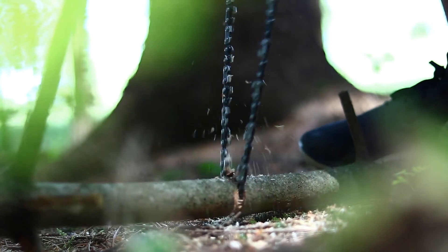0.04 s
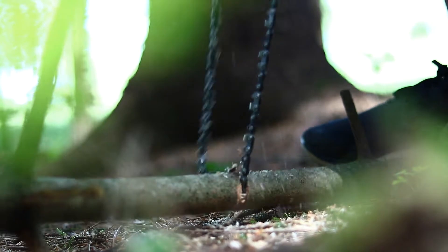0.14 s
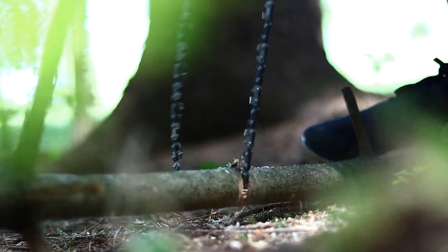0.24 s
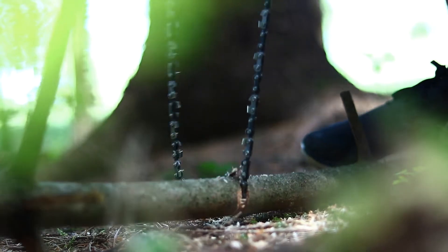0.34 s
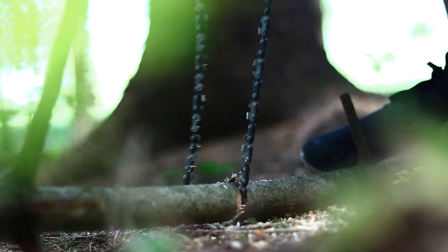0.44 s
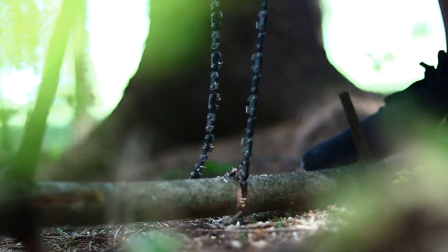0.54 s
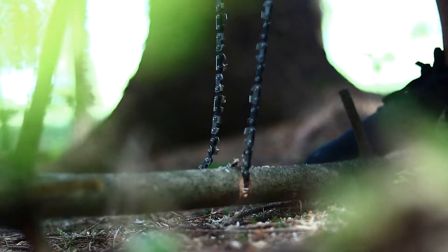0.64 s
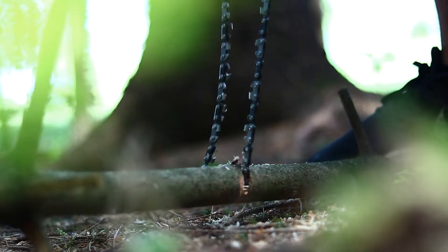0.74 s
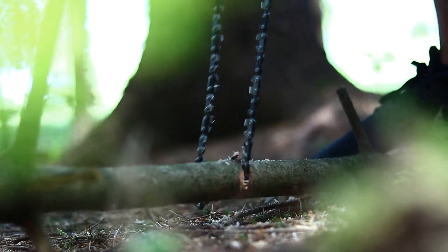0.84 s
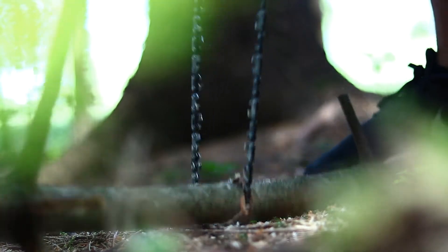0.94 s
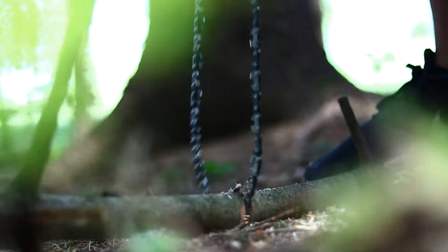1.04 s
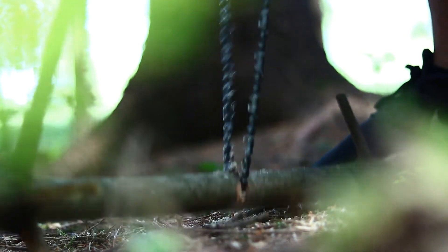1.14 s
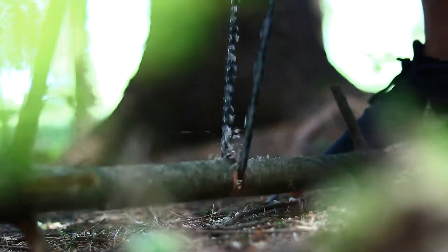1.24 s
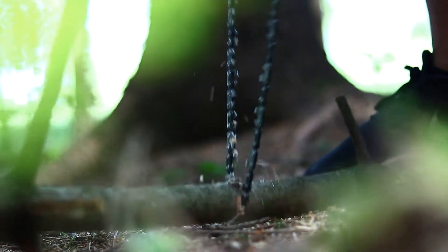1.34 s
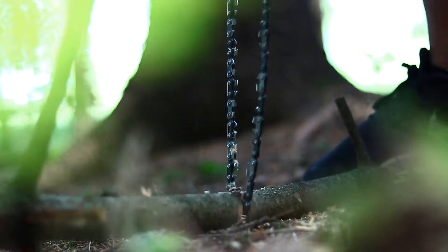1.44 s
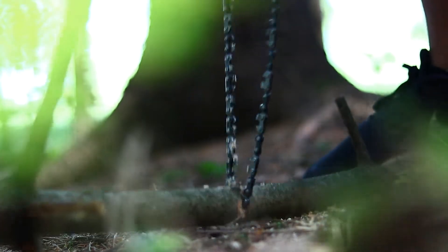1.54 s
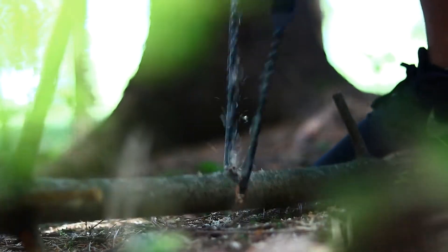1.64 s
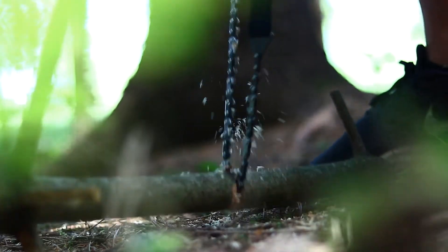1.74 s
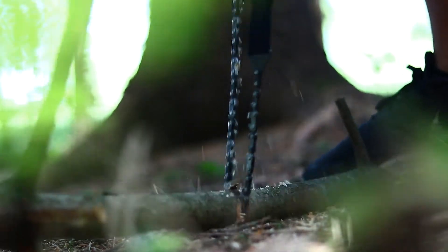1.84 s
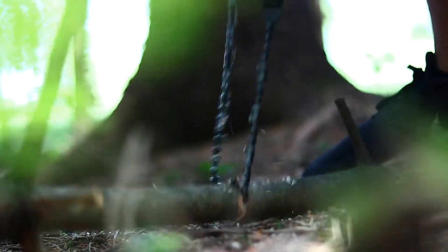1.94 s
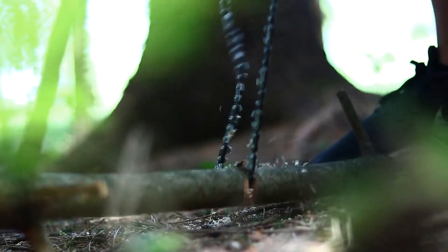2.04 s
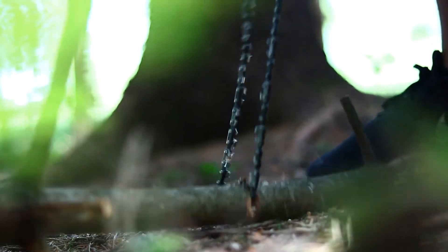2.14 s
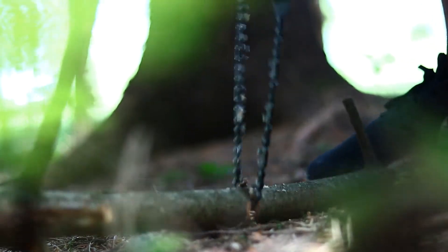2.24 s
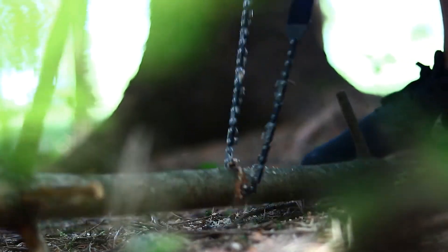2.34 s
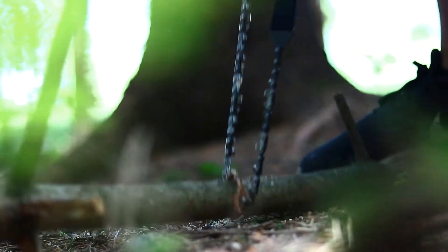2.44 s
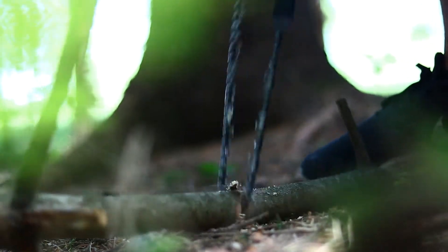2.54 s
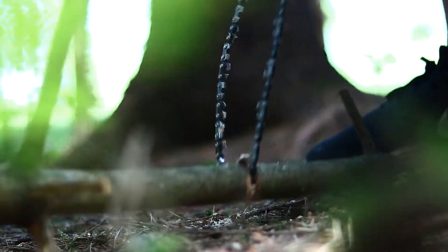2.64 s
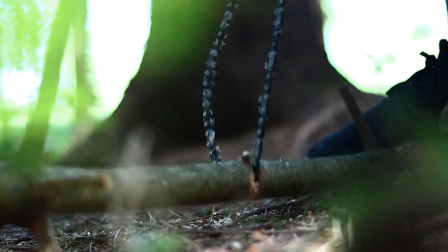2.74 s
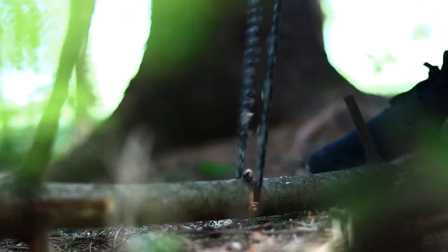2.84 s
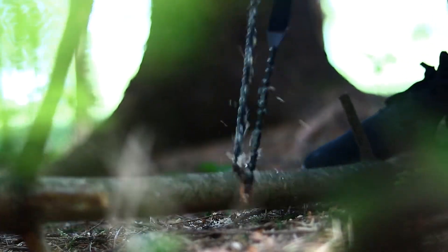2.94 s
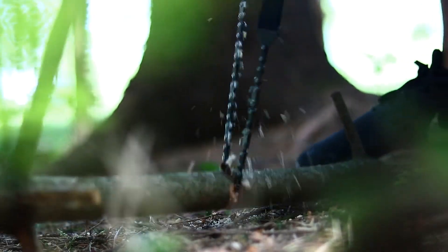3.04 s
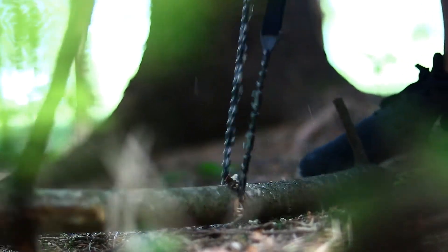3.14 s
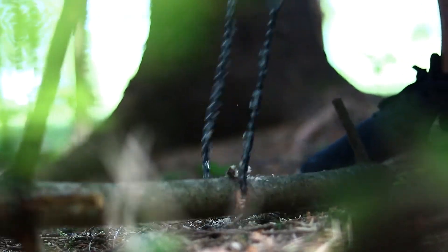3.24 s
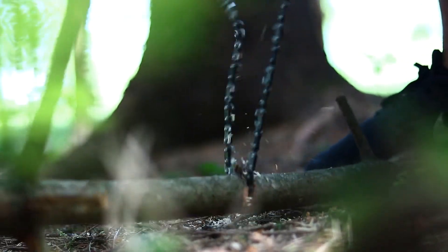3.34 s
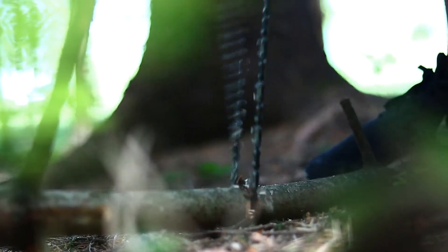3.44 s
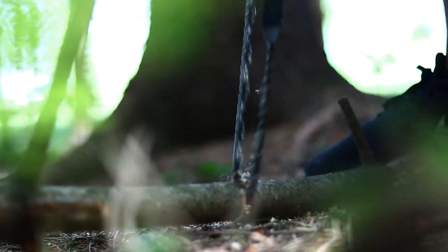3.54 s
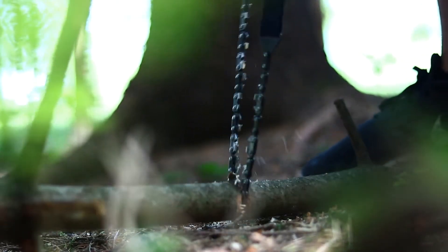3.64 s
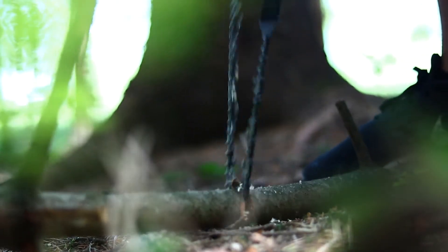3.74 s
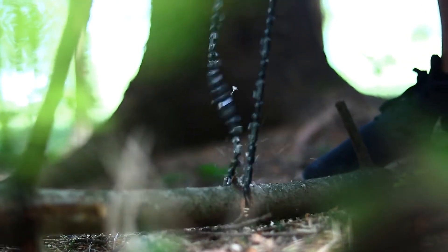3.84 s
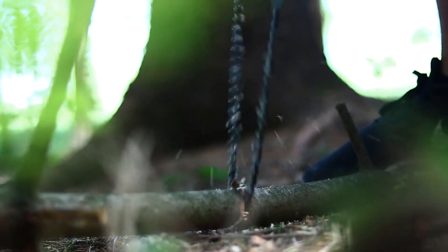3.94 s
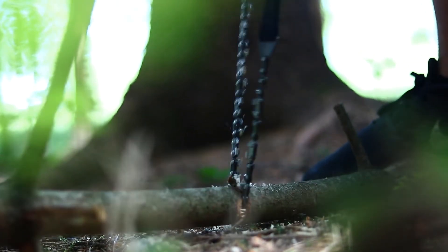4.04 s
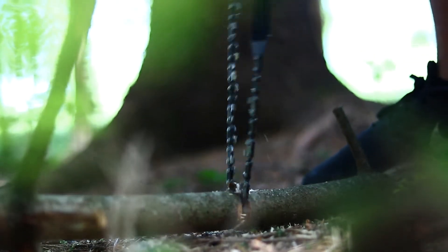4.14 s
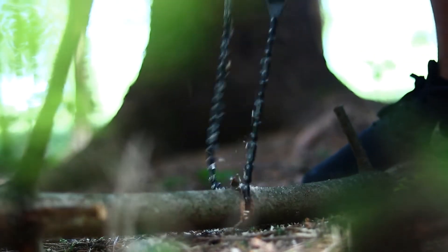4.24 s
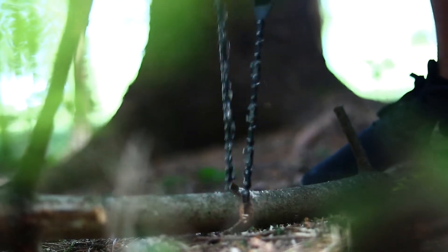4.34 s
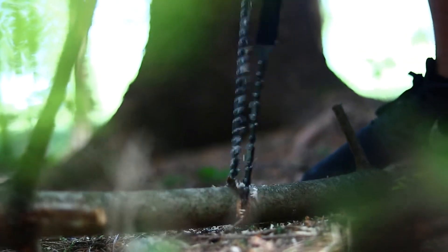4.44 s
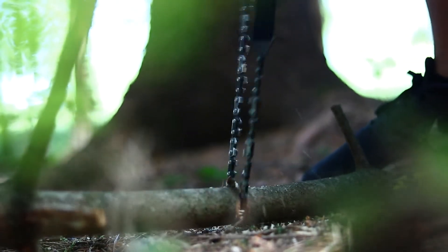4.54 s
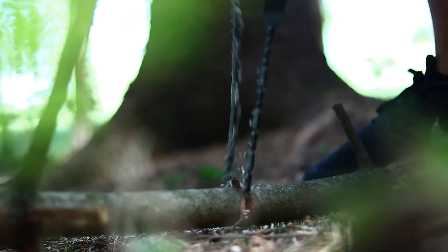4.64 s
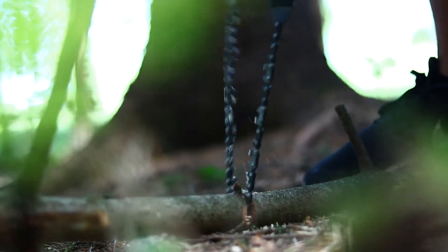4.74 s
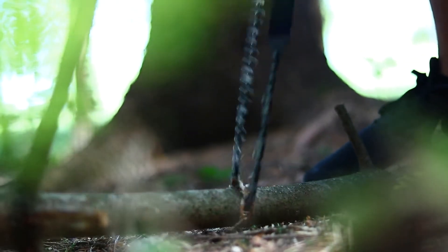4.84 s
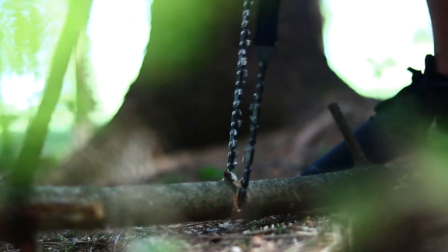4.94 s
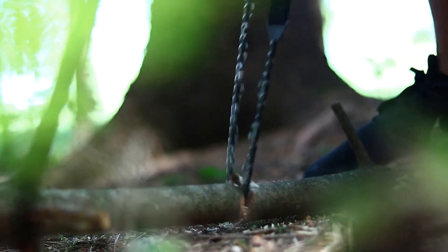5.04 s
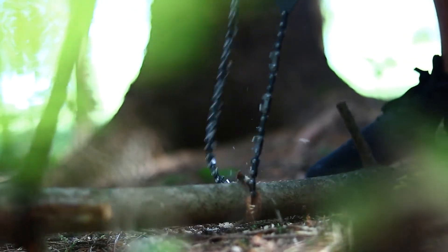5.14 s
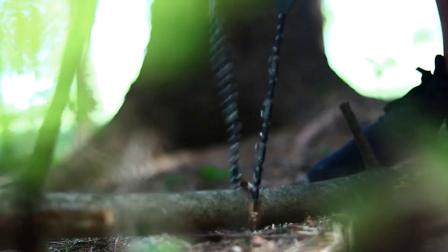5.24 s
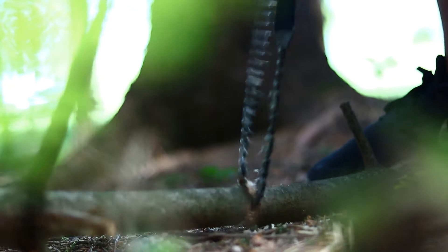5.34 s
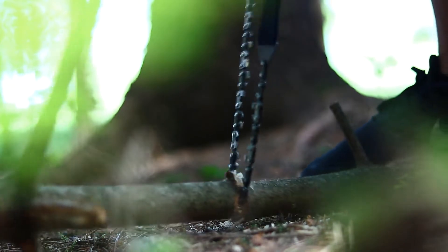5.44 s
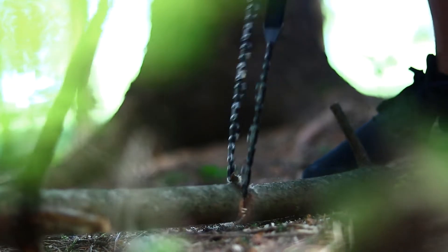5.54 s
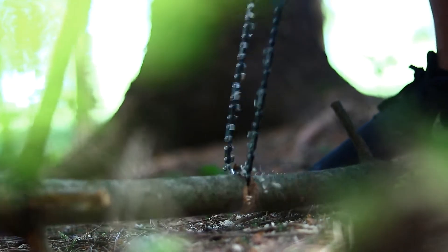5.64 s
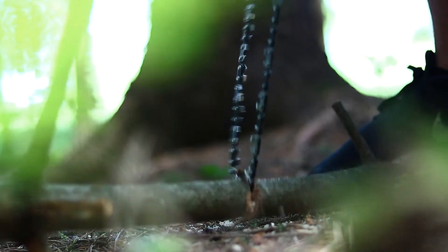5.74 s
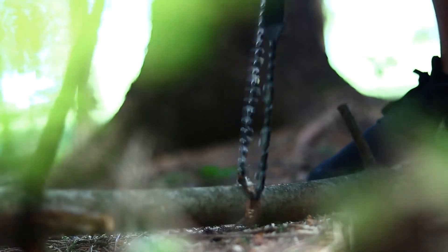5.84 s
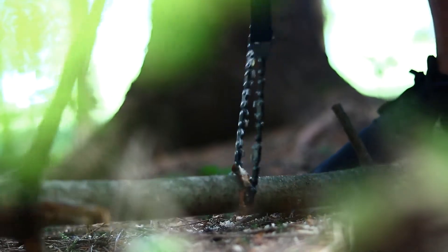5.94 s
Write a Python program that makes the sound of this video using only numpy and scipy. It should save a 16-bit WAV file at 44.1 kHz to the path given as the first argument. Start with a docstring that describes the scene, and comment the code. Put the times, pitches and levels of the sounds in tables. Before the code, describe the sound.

A chain is dragged back and forth through a branch by hand, scraping, snapping and catching in the wood outdoors.

```python
"""On a forest floor, a hand-pulled chain saw is dragged to and fro through a thin branch.
The chain rasps and rattles by friction in the cut, and its links snap over the wood. Teeth catch
and tear the fibres in short cracks, each a blow that excites the branch's damped modes. The branch
shoves and bumps the soil, and two faint squeaks sound over quiet outdoor air. One close microphone."""
import sys
import numpy as np
from scipy import signal
from scipy.io import wavfile
from scipy.ndimage import uniform_filter1d

SR = 44100
rng = np.random.default_rng(int(sys.argv[2]) if len(sys.argv) > 2 else 0)


def bounce(signal):
    """Save signal as a 16-bit WAV file at the path given by the first command-line argument."""
    frames = np.transpose(np.atleast_2d(signal))
    limited = np.clip(frames, -1, 1)
    pcm = np.round(limited * 32767).astype(np.int16)
    wavfile.write(sys.argv[1], SR, pcm)


N = 264600

# Spectrum of cracking and rasping wood. Each row: frequency in Hz, relative density in dB.
WOOD_SPECTRUM = [(410, -21), (700, -10), (908, -7.5), (990, -10), (1560, -3.5), (1670, -4), (3090, -8.5),
                 (3890, -4.5), (7000, -22.5), (9100, -25), (15400, -120)]
# Spectrum of torn fibres and rattling links. Each row: frequency in Hz, relative density in dB.
FIZZ_SPECTRUM = [(2000, -72), (4500, -9.5), (6000, -5), (6800, -14.5), (7750, 1), (8800, -1), (9400, -7),
                 (10800, -14), (13000, -5.5), (15200, -18.5), (17000, -55)]


def amp(db):
    """Amplitude ratio of a level in decibels."""
    return 10 ** (np.asarray(db) / 20)


def unit_rms(x):
    """Normalisation to a mean power of 1."""
    return x / np.sqrt(np.mean(x ** 2) + 1e-20)


def colour(x, spectrum):
    """Spectral shaping by a minimum-phase filter of unit energy."""
    hz, db = np.transpose(spectrum)
    bin_hz = abs(np.fft.fftfreq(8192, 1 / SR))
    log_gain = np.log(amp(np.interp(np.log(bin_hz + 1), np.log(hz + 1), db, left=-80, right=-80)))
    taps = np.fft.ifft(np.exp(np.conj(signal.hilbert(log_gain)))).real[:4096]
    return signal.oaconvolve(x, taps / np.linalg.norm(taps))[:N]


def swells(top_s, hold_s, top_db, rise_db_per_s, fall_db_per_s, rest_db):
    """Incoherent addition: gestures that climb, hold and fall add their powers to a resting level."""
    t = np.arange(0, N + 128, 128) / SR
    since = t[:, None] - top_s
    db = top_db + rise_db_per_s * np.minimum(since, 0) - fall_db_per_s * np.maximum(since - hold_s, 0)
    power = (amp(db) ** 2).sum(1) + amp(rest_db) ** 2
    return np.interp(np.arange(N) / SR, t, np.sqrt(power))


def grit(per_s, spread_db, grain_s, bed):
    """Shot-noise modulation: random bursts of uneven size roughen a steady bed of noise."""
    sizes = amp(spread_db * np.minimum(rng.exponential(1, N), 4))
    impulses = sizes * (rng.random(N) < per_s / SR)
    bursts = signal.lfilter([1], [1, -np.exp(-1 / (grain_s * SR))], impulses)
    return unit_rms((bed + unit_rms(bursts)) * rng.standard_normal(N))


def branch_ring(force, spread_db, detune):
    """Modal response of the branch; contact point and support shift the modes, here at random."""
    # Each row: frequency in Hz, relative level in dB, 60 dB decay time in seconds.
    modes = [(133, -12.5, 0.2), (230.8, -4.5, 0.15), (315.7, 3.5, 0.062), (417, -0.5, 0.09),
             (466.4, 3, 0.033), (560, 9, 0.023), (681, 8.5, 0.025), (842, 5.5, 0.018), (1048, -3.5, 0.032),
             (1335, 1.5, 0.023)]
    t = np.arange(SR // 5) / SR
    shifts = rng.standard_normal((len(modes), 2))
    response = sum(amp(db + spread_db * louder - 60 * t / t60)
                   * np.sin(2 * np.pi * hz * (1 + detune * higher) * t)
                   for (hz, db, t60), (louder, higher) in zip(modes, shifts))
    return signal.oaconvolve(force, response / np.linalg.norm(response))


def high_passed(x):
    """A third-order high-pass filter at 100 Hz keeps the branch's sound out of the deep bass."""
    return signal.sosfilt(signal.butter(3, 100, "high", fs=SR, output="sos"), x)


def chain_scrape():
    """Sliding friction rasps in the cut, rattles the links and drives the branch's modes."""
    # Each row: time of full speed in seconds, hold in seconds, rasp, rattle and drag gains in dB.
    pulls = [(0.0, 0.025, -25, -35.5, -37.5), (0.059, 0.0061, -45, -56, -29), (0.213, 0.017, -56, -54, -46),
             (0.767, 0.02, -65, -63, -68.5), (1.07, 0.17, -53.5, -53, -55.5), (1.307, 0.076, -42, -54, -52),
             (1.477, 0.12, -56, -56.5, -64), (1.728, .05, -34, -45.5, -41), (1.97, 0.2, -54, -52.5, -62),
             (2.3, 0.045, -52, -51, -60), (2.388, 0.036, -40, -48, -47.5), (2.597, 0.034, -50, -51, -69),
             (2.712, .03, -41.5, -46.5, -53.5), (2.926, 0.055, -50, -55, -76),
             (3.016, 0.047, -37, -49, -50), (3.235, 0.041, -54.5, -55, -64), (3.64, 0.018, -37.5, -44, -49),
             (3.885, 0.016, -45, -45.5, -70), (4.086, 0.03, -46.5, -53.5, -56), (4.29, .15, -59, -64, -73),
             (4.532, 0.0095, -41, -54, -64), (4.742, 0.045, -48.5, -57, -62),
             (4.906, 0.081, -52, -63, -57.5), (5.155, 0.25, -51, -60, -65.5), (5.4, 0.13, -45.5, -52, -55),
             (5.66, .1, -53.5, -60, -71), (5.857, 0.19, -48.5, -58, -58.5)]
    # The rasp, rattle and drag gains between pulls, in dB.
    slack_db = [-63, -68.5, -65]
    speed_up_s, stop_s = 0.08, 0.1
    top_s, hold_s, *gains_db = np.transpose(pulls)
    envelopes = []
    for db, rest_db in zip(gains_db, slack_db):
        climb_db = np.maximum(db - rest_db, 5)
        envelopes.append(swells(top_s, hold_s, db, climb_db / speed_up_s, climb_db / stop_s, rest_db))
    rub, shake, press = envelopes
    rasp = colour(rub * grit(per_s=170, spread_db=-2, grain_s=0.0016, bed=0.97), WOOD_SPECTRUM)
    rattle = np.zeros(N)
    for pitch in (0.93, 1, 1.07):  # three groups of loose links
        impacts = shake * grit(per_s=120, spread_db=3.5, grain_s=0.0012, bed=0.7)
        rattle += colour(impacts, np.multiply(FIZZ_SPECTRUM, [pitch, 1]))
    drag = press * grit(per_s=150, spread_db=3, grain_s=0.004, bed=1.2)
    murmur = sum(branch_ring(drag, spread_db=3, detune=0.05)[:N] for _ in range(2))
    return rasp + rattle + high_passed(murmur)


def ground_shoves():
    """The rocking branch forces the soil, giving low noise that grows and decays exponentially."""
    # Each row: time of the top in seconds, level in dB.
    shoves = [(0.0, -39), (.37, -48), (1.4, -39), (1.75, -40), (1.87, -46), (2.07, -41), (2.49, -50),
              (2.72, -48.5), (3.09, -46), (3.37, -38), (3.46, -40.5), (3.63, -37), (3.88, -48),
              (4.02, -37.5), (4.36, -45), (4.6, -48), (4.81, -43), (5.01, -45), (5.23, -42.5), (5.5, -40.5),
              (5.76, -35)]
    # Each row: frequency in Hz, relative density in dB.
    soil_spectrum = [(15, -73), (25, -38), (59, 0.5), (102, -18.5), (130, -3), (170, -17), (290, -120)]
    top_s, db = np.transpose(shoves)
    envelope = swells(top_s, 0, db, rise_db_per_s=250, fall_db_per_s=134, rest_db=-59.5)
    return envelope * unit_rms(colour(rng.standard_normal(N), soil_spectrum))


def outdoor_air():
    """Ambient sound is stationary noise, densest at low frequencies."""
    # Each row: frequency in Hz, relative density in dB.
    air_spectrum = [(18, -68), (30, -3), (109, -9), (149, -10.5), (328, -14), (355, -15.5), (473, -20),
                    (1070, -20), (2900, -24.5), (5590, -25), (16000, -30)]
    return amp(-53) * colour(rng.standard_normal(N), air_spectrum)


def link_snaps():
    """A link snapping over the wood is a brief impact, filtered by one broad resonance."""
    # Each row: start in seconds, peak level in dB, centre frequency in Hz.
    snaps = [(0.0154, -16, 4780), (0.0304, -7.5, 7700), (0.0445, -7, 3800), (0.0592, -11, 2760),
             (0.074, -21.5, 2840), (0.0842, -17, 2860), (0.097, -21, 2450), (0.193, -9, 3800),
             (0.973, -32, 9000), (1.0839, -16.5, 4350), (1.1792, -20, 12500), (1.194, -26, 3840),
             (1.297, -23, 4200), (1.3056, -17, 4130), (1.3656, -18, 4040), (1.395, -18.5, 8500),
             (1.499, -23, 7180), (1.595, -32, 4150), (1.7405, -15, 2750), (1.7931, -10.5, 7600),
             (1.819, -21, 4020), (1.9829, -21.5, 12400), (2.017, -22, 8900), (2.054, -18.5, 2500),
             (2.115, -23, 3900), (2.3208, -15, 12300), (2.3872, -11, 8300), (2.3975, -12, 8730),
             (2.412, -20, 8600), (2.4535, -17.5, 4040), (2.599, -20.5, 8400), (2.62, -21, 3850),
             (2.6325, -22, 7760), (2.6406, -18.5, 7960), (2.6913, -16, 2500), (2.7247, -16, 12200),
             (2.731, -18, 8000), (2.7518, -21, 3150), (3.026, -23, 8900), (3.0606, -18, 7650),
             (3.078, -12, 3900), (3.3419, -11, 3920), (3.5607, -22, 3550), (3.6307, -22.5, 3930),
             (3.703, -25, 4370), (3.8786, -20, 7670), (3.906, -12, 3300), (3.967, -17, 4540),
             (4.0448, -24, 2670), (4.1442, -16, 4120), (4.1547, -14, 4060), (4.1665, -9.5, 4150),
             (4.2483, -25.5, 3430), (4.3223, -10, 2530), (4.5056, -16.5, 6030), (4.5556, -16.5, 3630),
             (4.562, -22, 8180), (4.597, -21, 3800), (4.7597, -13, 3900), (4.777, -14, 3620),
             (4.792, -14, 4120), (4.9867, -14.5, 8400), (5.025, -26, 3920), (5.063, -39, 6000),
             (5.127, -33, 4500), (5.1782, -23.5, 3390), (5.1937, -15, 3600), (5.209, -20, 4000),
             (5.387, -32, 8160), (5.403, -23, 8200), (5.4252, -26, 8350), (5.638, -24.5, 8100),
             (5.675, -18, 8100), (5.696, -19.5, 2640), (5.7359, -12.5, 3800), (5.761, -25, 4000),
             (5.827, -28, 4950), (5.875, -24.5, 3900), (5.947, -33, 3390), (5.97, -26, 2520)]
    track, t = np.zeros(N + SR), np.arange(SR // 50) / SR
    envelope = np.exp(-t / 0.00025) + 0.25 * np.exp(-t / 0.0023)  # sharp click, short tail
    for start_s, db, hz in snaps:
        impact = envelope * rng.standard_normal(len(t))
        click = signal.lfilter(*signal.iirpeak(hz, Q=2.5, fs=SR), impact)
        track[round(start_s * SR):][:len(t)] += amp(db) * click / abs(click).max()
    return track[:N]


def strained(catches):
    """Strain builds before fracture: the wood creaks in a faint exponential swell up to each catch."""
    lead_in = signal.lfilter([0.006], [1, 0.006 - 1], catches[::-1])[::-1]
    return catches + amp(-16) * lead_in


def tooth_bites():
    """Fracture at each catching tooth releases a burst of splintering noise and strikes the branch."""
    # Each row: start in seconds, crack, fizz and knock gains in dB, 60 dB burst decay in seconds.
    catches = [(0.0468, -25, -19, -37, 0.042), (.192, -33, -37, -40, 0.087),
               (0.2194, -26.5, -31, -27.5, 0.063), (.227, -32, -31, -23, 0.081),
               (0.689, -40.5, -65, -71, 0.021), (1.0434, -42, -43, -70, .024),
               (1.08, -34.5, -46, -66, 0.041), (1.18, -40.5, -56, -58, 0.074),
               (1.3361, -30, -32, -25, 0.048), (1.3633, -20.5, -29.5, -16.5, 0.034),
               (1.4233, -31.5, -28.5, -25, 0.059), (1.6969, -26, -29, -27, .13),
               (1.7377, -33, -26.5, -27.5, 0.12), (1.7563, -20.5, -37.5, -14.5, 0.045),
               (1.791, -21, -34, -16, 0.035), (1.823, -33, -25, -43, 0.029),
               (1.8289, -25.5, -40, -30, 0.032), (2.014, -38.5, -35.5, -35, 0.17),
               (2.0324, -29.5, -52, -14.5, 0.11), (2.053, -35, -39, -20, .08),
               (2.1141, -46, -53, -36, 0.099), (2.135, -25, -25.5, -18.5, 0.062),
               (2.3353, -28.5, -35, -23.5, 0.026), (2.388, -27, -26, -32, 0.098),
               (2.4514, -31.5, -37, -30.5, 0.035), (2.492, -40, -37, -22, 0.037),
               (2.6176, -46, -34, -42, 0.03), (2.6761, -33.5, -47.5, -29.5, 0.052),
               (2.6882, -25, -27.5, -24.5, 0.06), (2.749, -33, -41, -55, 0.015),
               (2.7885, -53, -42.5, -27, 0.073), (2.9278, -36.5, -54, -42, 0.039),
               (2.9952, -26.5, -24.5, -31, 0.028), (3.026, -22.5, -18.5, -24.5, 0.064),
               (3.036, -24, -38, -27, 0.026), (3.0593, -23, -25, -14, 0.068),
               (3.1356, -59, -42, -25.5, .04), (3.2855, -37, -63, -63, 0.014),
               (3.3087, -21.5, -31, -13, 0.077), (3.3406, -19, -22, -27, 0.05),
               (3.3918, -22, -30.5, -12.5, 0.059), (3.5607, -37.5, -39, -34, 0.035),
               (3.606, -38, -33, -48, 0.036), (3.63, -56, -47, -56, 0.06),
               (3.6486, -36.5, -45, -30.5, 0.087), (3.686, -30, -28.5, -21, 0.035),
               (3.8705, -25, -31.5, -12.5, .11), (3.907, -28.5, -32, -27, 0.053),
               (3.9478, -24, -29, -17.5, 0.05), (4.0429, -30, -57, -30, 0.0078),
               (4.1152, -36.5, -39.5, -25.5, 0.11), (4.1319, -25, -26.5, -13.5, 0.028),
               (4.165, -23.5, -23, -22.5, 0.017), (4.247, -35, -38.5, -34, 0.022),
               (4.3055, -34, -44, -34, 0.033), (4.3207, -27, -32.5, -10, 0.12),
               (4.347, -30.5, -36, -22, 0.047), (4.4422, -31, -70, -39.5, 0.017),
               (4.49, -40.5, -37, -62, 0.059), (4.5344, -35, -35, -22, .14),
               (4.562, -30, -21, -19.5, 0.026), (4.578, -34, -36, -29, 0.022),
               (4.599, -30, -27, -49, 0.019), (4.7568, -32.5, -30.5, -13, 0.12),
               (4.792, -34, -37, -26.5, 0.056), (4.942, -41, -43.5, -42, .052),
               (4.9605, -35.5, -40, -22.5, 0.058), (4.9865, -36, -34, -35, 0.081),
               (5.022, -45, -38.5, -35, 0.028), (5.1901, -29, -36, -10.5, .14),
               (5.233, -33.5, -41, -33.5, 0.041), (5.3678, -35.5, -62, -40, 0.034),
               (5.4644, -32.5, -34.5, -24, 0.032), (5.5833, -46, -42, -34, 0.097),
               (5.6735, -45, -36, -54, 0.092), (5.694, -37, -52, -50, 0.056),
               (5.7325, -27, -34, -9.5, 0.049), (5.7987, -44, -39, -33, .033), (5.875, -45, -62, -65, .03),
               (5.9435, -31.5, -40, -36, .027), (5.966, -31, -30, -58, 0.028)]
    rise_s, blow_decay_s, chain_hz = 0.0013, 0.012, 1542
    crack, fizz, knock = np.zeros((3, N + SR))
    t = np.arange(SR // 8) / SR
    onset = 1 - np.exp(-(t / rise_s) ** 2)
    for start_s, crack_db, fizz_db, knock_db, t60 in catches:
        start = round(start_s * SR)
        burst = onset * amp(-60 * t / t60)
        crack[start:start + len(t)] += amp(crack_db) * burst / burst.max()
        fizz[start:start + len(t)] += amp(fizz_db) * burst / burst.max()
        blow = onset * np.exp(-t / blow_decay_s) * rng.standard_normal(len(t))
        ringing = branch_ring(blow, spread_db=3, detune=0.03)
        knock[start:start + len(ringing)] += amp(knock_db) * ringing / abs(ringing).max()
    coarse_grit = grit(per_s=800, spread_db=3, grain_s=0.0011, bed=0.73)
    fine_grit = grit(per_s=700, spread_db=5, grain_s=0.00061, bed=0.25)
    tearing = colour(strained(crack[:N]) * coarse_grit, WOOD_SPECTRUM)
    fibres = colour(strained(fizz[:N]) * fine_grit, FIZZ_SPECTRUM)
    # The tearing drives a narrow resonance of the taut chain.
    singing = amp(1) * signal.lfilter(*signal.iirpeak(chain_hz, Q=45, fs=SR), tearing)
    return tearing + singing + fibres + high_passed(knock[:N])


def squeaks():
    """Random frequency modulation makes each thin, faint tone waver."""
    # Each row: start and end in seconds, pitch in Hz, rms level in dB, waver as a fraction of pitch.
    tones = [(1.59, 1.685, 4100, -59, .008), (5.29, 5.56, 2100, -55, .02)]
    fade_s = 0.012
    track, t = np.zeros(N), np.arange(N) / SR
    for start_s, end_s, hz, db, depth in tones:
        waver = 1 + depth * unit_rms(uniform_filter1d(rng.standard_normal(N), size=500))
        fade = np.clip(np.minimum(t - start_s, end_s - t) / fade_s, 0, 1)
        track += amp(db) * np.sqrt(2) * fade * np.sin(2 * np.pi * np.cumsum(hz * waver) / SR)
    return track


def soil_thuds():
    """Each bump of the branch on the soil excites two low modes into damped free vibration."""
    # Each row: start in seconds, peak level in dB.
    bumps = [(2.032, -26), (2.054, -18.5), (2.689, -25.5), (3.965, -25), (3.996, -30)]
    # Each row: frequency in Hz, relative level in dB, 60 dB decay time in seconds.
    modes = [(81, -1.5, .17), (133, 1, 0.092)]
    impulses, t = np.zeros(N), np.arange(SR // 4) / SR
    response = sum(amp(db - 60 * t / t60) * -np.sin(2 * np.pi * hz * t) for hz, db, t60 in modes)
    start_s, peak_db = np.transpose(bumps)
    impulses[np.round(start_s * SR).astype(int)] = amp(peak_db)
    return signal.oaconvolve(impulses, response / abs(response).max())[:N]


def scene():
    """The sources superpose at one microphone, which feeds both channels."""
    sawing = chain_scrape() + link_snaps() + tooth_bites() + squeaks()
    return np.tile(sawing + ground_shoves() + soil_thuds() + outdoor_air(), (2, 1))


def record(dry):
    """Faint hiss enters the two channels in antiphase, and a low-pass filter limits the band."""
    # Each row: frequency in Hz, relative density in dB.
    hiss_spectrum = [(12, -32), (20, -10), (513, -8.5), (2460, -19), (5380, -9.5), (14700, -6.5),
                     (16000, -11)]
    hiss = amp(-67) * colour(rng.standard_normal(N), hiss_spectrum)
    low_pass = signal.firwin(511, cutoff=16400, window=("kaiser", 13), fs=SR)
    return signal.oaconvolve(dry + [hiss, -hiss], low_pass[None], "same")


dry = scene()
out = record(dry)
bounce(out)
```